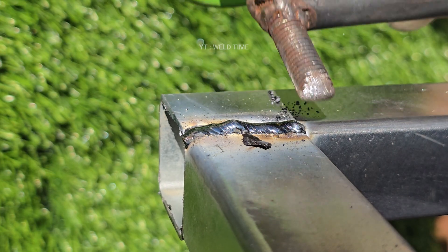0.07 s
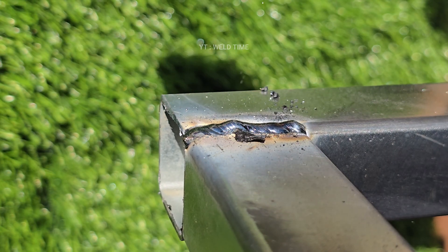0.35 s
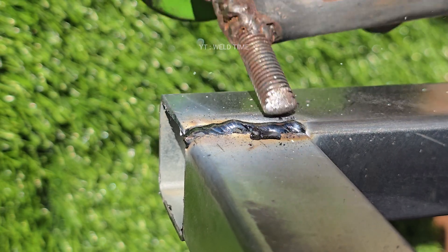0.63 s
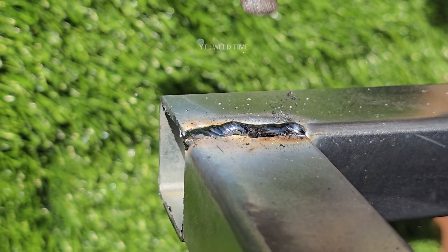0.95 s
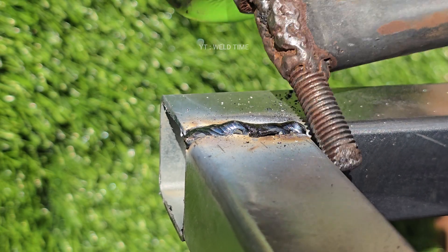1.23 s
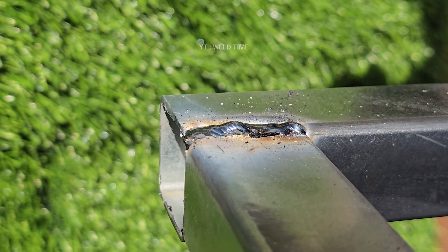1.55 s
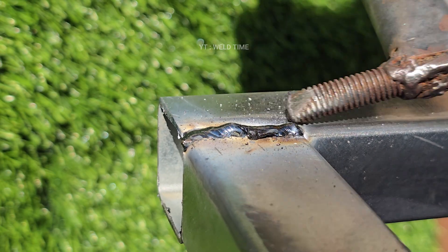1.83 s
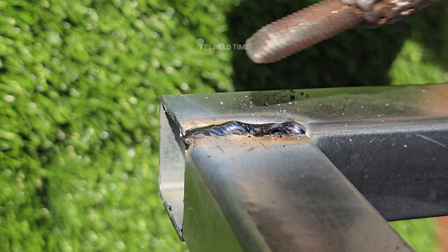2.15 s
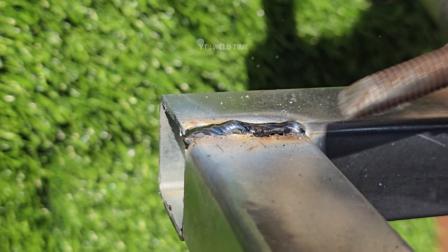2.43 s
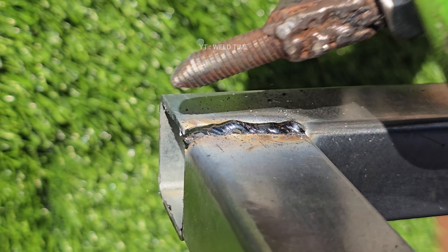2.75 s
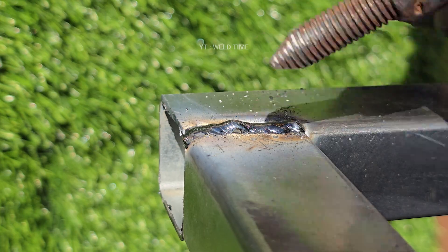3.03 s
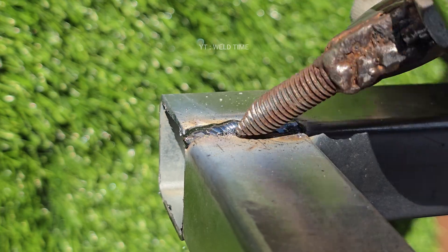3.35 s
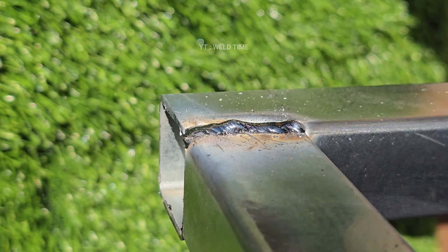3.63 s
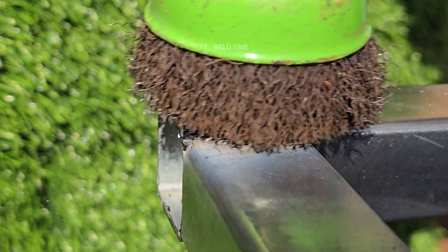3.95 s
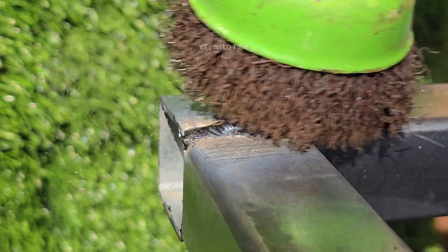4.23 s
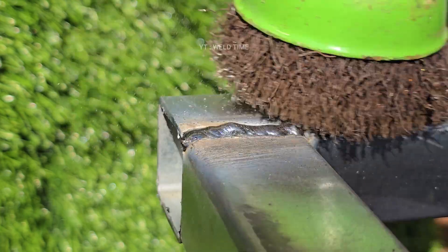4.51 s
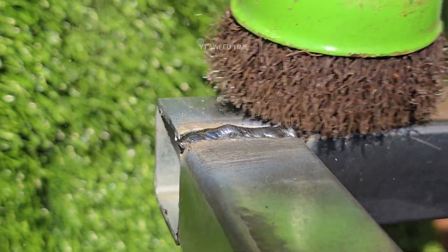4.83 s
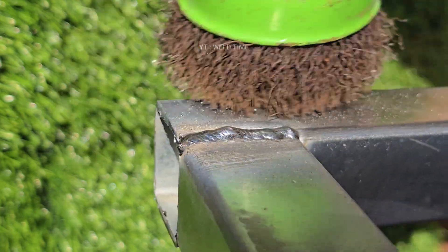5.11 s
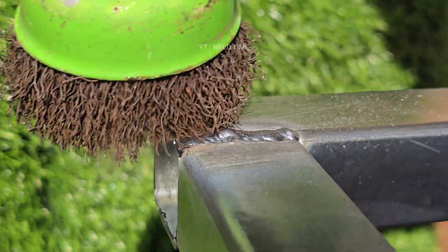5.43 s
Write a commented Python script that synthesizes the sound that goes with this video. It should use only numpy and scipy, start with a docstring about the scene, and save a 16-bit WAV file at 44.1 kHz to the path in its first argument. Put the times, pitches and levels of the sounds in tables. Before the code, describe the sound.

A hammer taps slag off a steel tube in quick ringing clanks, then a wire brush scrubs it by hand, over distant traffic.

```python
"""Outdoors, over the steady rumble of distant traffic, a home-made chipping hammer knocks slag off a weld
on square steel tube: each impact excites the damped modes of tube and hammer. It glances off the seam,
wedges in the corner, then is turned to strike from the side. From 3.9 s a wire cup brush, not spinning,
is scrubbed to and fro by hand: countless tiny impacts merge into a hiss, and the tube rings faintly
under it. For the last few strokes the hand presses harder."""
import sys
import numpy as np
from scipy import signal
from scipy.fft import rfft, irfft, next_fast_len
from scipy.io import wavfile
from scipy.ndimage import uniform_filter1d

SR = 44100
rng = np.random.default_rng(int(sys.argv[2]) if len(sys.argv) > 2 else 0)


def unload_wav(signal):
    """Save mono or channel-first audio to the path in sys.argv[1] as 16-bit WAV at rate SR, clipped to [-1, 1]."""
    wavfile.write(
        sys.argv[1],
        SR,
        np.round(np.clip(np.atleast_2d(signal).T, -1, 1) * 32767).astype(np.int16),
    )


N = 245637
TIME = np.arange(N) / SR
CUTOFF_HZ = 15800
BRUSH_ON_S, PRESS_S = 3.91, 5.03   # the wires touch the steel; the hand starts to press harder

# Levels in the tables are relative: each source adds its own gain.
# hammer blows: (time [s], level [dB], low clank [dB], bright edge [dB], hammer ring [dB],
# frequency favoured by the struck spot [Hz])
BLOWS = [(0.0700, -17, -11, -13, -48, 7300), (0.2739, -17, -10, -16, -55, 6600),
         (0.4684, -15, -8, -11, -44, 4730), (0.6597, -19, -7.5, -16, -55, 5800),
         (0.8538, -17, -11, -13.5, -60, 7100), (1.0563, -17.5, -5, -14.5, -41, 5300),
         (1.2615, -16.5, -8.5, -12, -37, 5130), (1.8972, -14.5, -13, -11, -45, 7360),
         (2.1064, -14, -8.5, -14, -28, 4560), (2.317, -15, -9, -11.5, -33, 9000),
         (2.5315, -15, -8, -14.5, -36, 2900), (2.7305, -16.5, -14, -8, -25, 3020),
         (2.9483, -20.5, -9.5, -2, -21.5, 9400), (3.1645, -19, -5, -6.5, -20, 2940),
         (3.3652, -19, -8.5, -2.5, -34, 4950)]
# ways of holding the hammer, in turn glancing, wedged and sideways:
# (start [s], face [0 front, 1 side], damping [dB/s], skid [ms], clear ring [dB], crack [dB])
GRIPS = [(0, 0, 7, 4.1, 0.5, 1), (1, 0, 132, 1.4, -6.5, 4), (1.6, 1, 56, 8, -1.5, 1.1)]
# the tip falls back on the steel after some blows: (time [s], level [dB], hammer ring [dB])
REBOUNDS = [(0.4859, -39.5, -60), (1.9175, -19, -41), (2.5512, -17.5, -27), (2.7555, -16.5, -19.5),
            (2.984, -27.5, -47), (3.374, -19, -26.5)]
# the tube's clear modes: (frequency [Hz], struck in front [dB], struck on the side [dB],
# brushed [dB], decay time T60 [s])
TUBE_MODES = [(1020.0, -32.0, -31.0, -39.0, 0.1), (1430.0, -30.0, -31.0, -34.0, 0.07),
              (1739.0, -42.0, -27.0, -39.0, 0.1), (2563.0, -39.0, -38.0, -44.0, 0.9),
              (2936.0, -28, -30, -31.0, 0.3), (3920.0, -30.5, -37.0, -26.0, 0.37),
              (4120.0, -32.0, -36.0, -26.0, 0.12), (4669.0, -28.0, -26.0, -35.0, 0.12),
              (4847.0, -20.0, -19.0, -21.0, 0.22), (4980.0, -31.0, -36.0, -29.0, 0.2),
              (5490.0, -22.0, -26.0, -29.0, 0.1), (5690.0, -22.0, -21.0, -19.0, 0.1),
              (5860.0, -26.0, -26.0, -19.0, 0.12), (6262.0, -25.0, -32.0, -28.0, 0.2),
              (6880.0, -28.0, -31.0, -20.0, 0.25), (7068.0, -21.5, -28.0, -23.0, 0.19),
              (8155.0, -26.0, -31.0, -19.0, 0.17), (8737.0, -40.0, -40.0, -13.0, 0.18),
              (9020.0, -38.0, -37.0, -13.0, 0.09), (9282.0, -34.0, -20.0, -12.0, 0.13),
              (9620.0, -43.0, -28.0, -26.0, 0.1), (10342.0, -47.0, -34.0, -23.0, 0.19),
              (10950.0, -43.0, -28.0, -15.0, 0.12), (11400.0, -51.0, -44.0, -19.0, 0.08),
              (11760.0, -39.0, -29.0, -18.0, 0.09), (12140.0, -42.0, -28.0, -18.0, 0.1),
              (12391.0, -31.0, -24.0, -11.5, 0.11), (13810.0, -33.0, -32.0, -13.0, 0.08),
              (14370.0, -34.0, -33.0, -16.0, 0.08), (15150.0, -39.0, -25.0, -18.0, 0.07)]
# the hammer's modes, longest-lived last: (frequency [Hz], level [dB], decay time T60 [s])
HAMMER_MODES = [(1879, 1, .11), (3266, -2, .1), (3418.5, -2, .34)]
# spectral envelope of the tube's crowd of weak modes: (frequency [Hz], level [dB])
CLANK_SPECTRUM = [(400, -11), (850, -12), (1100, -6), (1900, 0.5), (2600, -12.5), (3300, -5), (4100, -8),
                  (5300, -4.5), (7100, -5.5), (8600, -10), (10500, -11), (12000, -6), (13200, -9),
                  (15500, -11)]
# brush strokes, to and fro: (midpoint [s], level [dB])
STROKES = [(3.951, -44), (4.044, -41.5), (4.185, -34), (4.308, -34), (4.455, -35.5), (4.584, -38.5),
           (4.711, -34), (4.844, -35), (4.969, -35), (5.100, -31), (5.228, -30.5), (5.346, -29),
           (5.48, -31)]
# hiss of the wire tips: (frequency [Hz], level [dB])
WIRE_SPECTRUM = [(1500, -14.5), (2600, -4), (4000, 5), (6000, 6.5), (8000, 9), (9000, 5.5), (10500, 8.5),
                 (12200, 9.5), (13300, 2), (14200, -3), (15600, 10.5)]
# spectral density of the traffic: (frequency [Hz], level [dB])
TRAFFIC_SPECTRUM = [(25, -34.5), (66, 0), (110, -13.5), (150, -11.5), (260, -26), (380, -25.5), (600, -31),
                    (900, -37), (1800, -36), (3300, -45), (5000, -48), (8000, -57.5), (15500, -63.5)]
# slow course of the traffic: (time [s], rumble [dB], road noise [dB])
TRAFFIC_LEVELS = [(0.0, -29.5, -36.5), (0.85, -38.5, -42), (1.94, -35.5, -39), (4.05, -35.5, -43),
                  (4.25, -37, -42.5), (5.57, -36.5, -42)]
# far engines: (peak time [s], Gaussian width [s], frequency [Hz], glide [Hz/s], level [dB])
ENGINES = [(0.105, 0.27, 39.4, -18, -28.5), (0.344, 0.14, 165, 34.5, -32.5), (0.695, 0.2, 145.9, 24.5, -37),
           (0.953, 0.055, 40, 0, -25), (1.149, 0.16, 100.2, -34.5, -32.5), (1.49, 0.1, 41, 1.5, -27),
           (1.804, 0.22, 73.26, -0.5, -32), (2.5, 0.99, 151.9, 0, -43), (2.716, 0.6, 111.6, 2.5, -36),
           (2.998, 1, 47.02, 0.5, -29.5), (3.542, 0.85, 39.13, .5, -20.5), (4.7, 0.46, 49.4, -0.5, -41),
           (4.32, .2, 86.7, 3, -27), (5.103, 0.6, 89.6, 1, -31.5)]
# likeness of the sound at the two ears: (frequency [Hz], coherence [0 to 1])
COHERENCE = [(40, 0.74), (130, 0.94), (260, 0.89), (520, 0.52), (1000, 0.19), (2000, 0.27), (8000, 0)]
# balance of the ringing steel between the ears: (frequency [Hz], left minus right [dB])
RING_BALANCE = [(1000, 0.5), (4000, -2), (9000, 2), (15000, 1.5)]


def chipping(crowd_t60=0.14, shimmer_t60=0.42, crack_s=0.0025, vary_db=2.2, count=440, size=9000):
    """Modal superposition: each impact excites the tube's clear and weak modes, frame and hammer."""
    out, t = np.zeros((2, N)), np.arange(4 * size) / SR
    crowd_hz = 400 + (np.arange(count) + rng.random(count)) * (CUTOFF_HZ - 400) / count
    crowd = damped_modes(crowd_hz, crowd_t60 * np.exp(0.074 * rng.standard_normal(count)), size)
    tube_hz, front_db, side_db, _, tube_t60 = np.transpose(TUBE_MODES)
    tube = damped_modes(tube_hz, tube_t60, len(t))
    hammer_hz, hammer_db, hammer_t60 = np.transpose(HAMMER_MODES)
    hammer = damped_modes(hammer_hz, hammer_t60, len(t))
    hammer[:, -1] *= from_db(7.5 * np.minimum(t / 0.076, 1))   # sings out as the hammer lifts clear
    add(out, 0, from_db(-38) * hammer[:, -1] * np.minimum(t / 0.0046, 1))   # an earlier blow rings on
    # vibration that has spread through the welded frame returns as a dense shimmer
    shimmer = unit_rms(band(rng.standard_normal((2, N)), 2880, 6200))
    fading = from_db(-12 - 60 * t / shimmer_t60)
    for s, level_db, low_db, edge_db, ring_db, spot_hz, *grip in contacts():
        on_side, damping, skid_ms, clear_db, crack_db = grip
        held = from_db(-damping * t)   # a tip that stays on the steel shortens clank and shimmer
        crack = from_db(crack_db * np.exp(-t[:size] / crack_s))   # the first instant is louder
        tilt_db = at_hz([(2000, low_db + 7), (4500, 0), (8000, 0), (10000, edge_db + 8)], crowd_hz)
        crowd_db = at_hz(CLANK_SPECTRUM, crowd_hz) + tilt_db + spot_emphasis(crowd_hz, spot_hz)
        weights = from_db(crowd_db + vary_db * rng.standard_normal(count)) * rng.choice([-1, 1], count)
        response = (weights / np.sqrt(count / 8)) @ crowd * held[:size] * crack
        clank = signal.fftconvolve(response, skid(skid_ms)[None], axes=1)
        add(out, s, from_db(level_db + 5) * clank)
        start = rng.integers(N - len(t))
        add(out, s, from_db(level_db) * fading * held * shimmer[:, start:start + len(t)])
        tube_db = (side_db if on_side else front_db) + clear_db + spot_emphasis(tube_hz, spot_hz)
        strengths = from_db(tube_db + vary_db * rng.standard_normal(len(tube_hz)))
        add(out, s, from_db(level_db + 14) * (strengths @ tube))
        add(out, s, from_db(ring_db - 0.5) * (from_db(hammer_db) @ hammer))
    return out


def contacts(damping_db_per_s=300, skid_ms=4.5):
    """Impact excitation: the blows, then the strongly damped rebounds and brush landing, with grips."""
    def latest(table, s):
        return table[sum(s >= row[0] for row in table[1:])]
    rows = [(*blow, *latest(GRIPS, blow[0])[1:]) for blow in BLOWS]
    for s, level_db, ring_db in REBOUNDS:   # duller than its blow, on the same spot
        _, on_side, _, _, clear_db, crack_db = latest(GRIPS, s)
        grip = (on_side, damping_db_per_s, skid_ms, clear_db, crack_db)
        rows.append((s, level_db, -4, -19, ring_db, latest(BLOWS, s)[-1], *grip))
    # the brush is set down with a light knock: no hammer ring, no favoured frequency
    landing = (BRUSH_ON_S, -35.5, -3, -7, -np.inf, np.inf, 1, damping_db_per_s, skid_ms, 0, 0)
    return rows + [landing]


def skid(decay_ms, drag=0.91, clicks_per_s=4000, size=1500):
    """Contact force of unit energy: one impulse, then ever weaker clicks as the tip crunches slag."""
    clicks = rng.standard_normal(size) * (rng.random(size) < clicks_per_s / SR)
    clicks *= np.exp(-np.arange(size) / SR * 1000 / decay_ms)
    clicks *= drag / np.sqrt(np.sum(clicks ** 2) + 1e-12)
    clicks[0] = 1
    return clicks / np.sqrt(np.sum(clicks ** 2))


def spot_emphasis(hz, spot_hz, height_db=4, width_octaves=0.15):
    """The point of excitation weights the modes: extra dB near the frequency that it favours."""
    return height_db * np.exp(-.5 * ((np.log2(hz) - np.log2(spot_hz)) / width_octaves) ** 2)


def brushing(half_stroke_s=0.043, wire_t60=0.038, count=40, size=5000):
    """Forced vibration: the flicking tips hiss, and drive the tube and new wires on each stroke."""
    flicks = wire_flicks()
    flick_envelope = np.sqrt(uniform_filter1d(flicks ** 2, size=24) + 1e-6)
    hiss = unit_rms(coloured_noise(WIRE_SPECTRUM) * flick_envelope)
    effort_db, = in_time(STROKES)
    touching = np.clip((TIME - BRUSH_ON_S) / .01, 0, 1)
    out = from_db(effort_db - 8) * hiss * touching   # the wires still rustle as the hand turns
    tube_hz, _, _, tube_db, t60 = np.transpose(TUBE_MODES)
    t60 = np.minimum(t60, .1)   # the wires damp the longest rings
    tube = damped_modes(tube_hz, t60, size)
    offsets = np.arange(-size, size)
    bite_band = signal.butter(1, [6200, 10200], "band", fs=SR, output="sos")
    for s, level_db in STROKES:
        speed = from_db(level_db) * np.exp(-1.3 * np.abs(offsets / SR / half_stroke_s) ** 3)
        span = np.minimum(round(s * SR) + offsets, N - 1)
        wire_hz = rng.uniform(5000, CUTOFF_HZ, count)
        wire_modes = damped_modes(wire_hz, np.full(count, wire_t60), size)
        twang = from_db(at_hz(WIRE_SPECTRUM, wire_hz)) @ wire_modes
        body = from_db(tube_db + 2 * rng.standard_normal(len(tube_hz))) / np.sqrt(t60) @ tube
        response = (from_db(-2) * unit_rms(twang) + from_db(1.5) * unit_rms(body)) / np.sqrt(size)
        ring = signal.fftconvolve((flicks[span] * speed)[None], response, axes=1)[:, :len(span)]
        stroke = ring + from_db(-0.5) * hiss[:, span] * speed
        bite = from_db(-6.5 if s < PRESS_S else 2.5)   # pressing harder fills in the middle of the hiss
        stroke += (bite - 1) * signal.sosfilt(bite_band, stroke)
        add(out, s - size / SR, stroke / np.sqrt((1 + bite ** 2) / 2))
    return out


def wire_flicks(tips_per_s=6000, grain_db=3.5, snags_per_s=30, snag_db=17, flutter_db=1.74):
    """Shot noise: tips flick over the seam at random; a few catch on the bead and snap free."""
    hits = rng.random(N) < tips_per_s / SR
    flicks = hits * from_db(grain_db * np.minimum(rng.exponential(1, N), 4)) * rng.choice([-1, 1], N)
    snags = (rng.random(N) < snags_per_s / SR) * from_db(snag_db) * rng.standard_normal(N)
    return (unit_rms(flicks) + snags) * from_db(flutter_db * drift(29))


def reflections(x, ground_s=0.0036, ground_db=-12, tail_db=-17, t60=0.18, size=12000):
    """Reflection: a weak bounce off the ground and a short dull tail from walls join the direct sound."""
    t = np.arange(size) / SR
    tail = band(rng.standard_normal((2, size)), 190, 7400)
    tail *= from_db(-60 * t / t60) * np.minimum(t / 0.0015, 1)
    echo = from_db(tail_db) * tail / np.sqrt(np.sum(tail ** 2) / 2)
    echo[:, round(ground_s * SR)] += from_db(ground_db)
    return x + signal.fftconvolve(x, echo, axes=1)[:, :N]


def traffic(whine_hz=539.5, whine_db=-51.5):
    """Incoherent sources add: rumble, road noise, tyre hiss, swelling engine drones and a thin whine."""
    out = np.zeros((2, N))
    rumble_db, road_db = in_time(TRAFFIC_LEVELS)
    rumble, road, tyres = (rumble_db + 5, 28, 324), (road_db + 2.5, 250, 862), (road_db - 3, 950, 18000)
    for level_db, low_hz, high_hz in (rumble, road, tyres):
        out += from_db(level_db) * unit_rms(band(coloured_noise(TRAFFIC_SPECTRUM), low_hz, high_hz))
    for s, width_s, pitch_hz, glide, level_db in ENGINES:
        swell = from_db(level_db + 3 * drift(11.4)) * np.exp(-.5 * ((TIME - s) / width_s) ** 2)
        hz = (pitch_hz + glide * (TIME - s)) * (1 + 0.011 * drift(7.6))
        out += swell * tone(hz)
    return out + from_db(whine_db + 2.5 * drift(3)) * tone(whine_hz + 1.44 * drift(2.67))


def damped_modes(hz, t60, size):
    """Free vibration: decaying sines (ears x modes x samples), with a phase and level for each ear."""
    t = np.arange(size) / SR
    phase_gap = np.arccos(at_hz(COHERENCE, hz)) * rng.choice([-1, 1], len(hz))
    phase = rng.uniform(0, 2 * np.pi, len(hz)) + phase_gap * np.array([[0], [1]])
    ear_gain = from_db(at_hz(RING_BALANCE, hz) * np.array([[.5], [-.5]]))
    sines = np.sin(2 * np.pi * hz[:, None] * t + phase[..., None])
    return ear_gain[..., None] * sines * from_db(-60 * t / t60[:, None])


def coloured_noise(spectrum):
    """Partial coherence: steady stereo noise of a given spectrum, alike at both ears in the bass only."""
    size = next_fast_len(N, True)
    hz = np.arange(size // 2 + 1) * SR / size
    mid, side = rfft(rng.standard_normal((2, size)))
    alike = at_hz(COHERENCE, hz)
    ears = np.sqrt(1 + alike) * mid + np.sqrt(1 - alike) * side * [[1], [-1]]
    return irfft(from_db(at_hz(spectrum, hz)) * ears, size)[:, :N]


def tone(hz):
    """A sine of unit power whose phase is the integral of its frequency."""
    return np.sqrt(2) * np.sin(2 * np.pi * np.cumsum(hz) / SR)


def drift(rate_hz, step=40, settle=2000):
    """Low-passed noise: a slow random fluctuation of unit power."""
    pole = np.exp(-2 * np.pi * rate_hz * step / SR)
    noise = rng.standard_normal(N // step + settle + 2)
    slow = signal.lfilter([1], [1, -2 * pole, pole * pole], noise)[settle:]
    return np.interp(np.arange(N) / step, np.arange(len(slow)), unit_rms(slow))


def band(x, low_hz, high_hz):
    """Causal band-pass filter."""
    return signal.sosfilt(signal.butter(2, [low_hz, high_hz], "band", fs=SR, output="sos"), x)


def at_hz(points, hz):
    """Interpolation of a spectrum on a logarithmic frequency axis."""
    knots_hz, values = np.transpose(points)
    return np.interp(np.log(np.maximum(hz, 1)), np.log(knots_hz), values)


def in_time(rows):
    """Linear interpolation of each column at every sample."""
    s, *columns = np.transpose(rows)
    return [np.interp(TIME, s, column) for column in columns]


def add(out, s, sound):
    """Superposition of a sound that starts at s seconds."""
    at = round(s * SR)
    out[:, at:at + sound.shape[1]] += sound[:, :N - at]


def from_db(db):
    """Decibels to amplitude ratio."""
    return 10 ** (np.asarray(db) / 20)


def unit_rms(x):
    """Normalisation to unit power."""
    return x / np.sqrt(np.mean(x ** 2) + 1e-20)


def scene():
    """Superposition of near tools and far traffic; a level difference sets all a little to the left."""
    tools = chipping() + from_db(2.5) * brushing()
    return (reflections(tools) + traffic()) * from_db([[.4], [-.4]])


def record(dry, ceiling=1.2):
    """Soft saturation rounds the peaks; a steep low-pass filter removes the highest treble."""
    low_pass = signal.ellip(10, .1, 80, CUTOFF_HZ, fs=SR, output="sos")
    return signal.sosfilt(low_pass, ceiling * np.tanh(dry / ceiling))


dry = scene()
out = record(dry)
unload_wav(out)
```